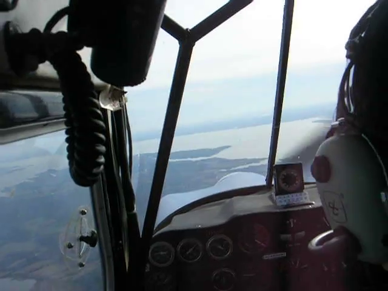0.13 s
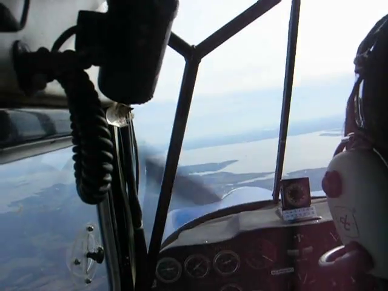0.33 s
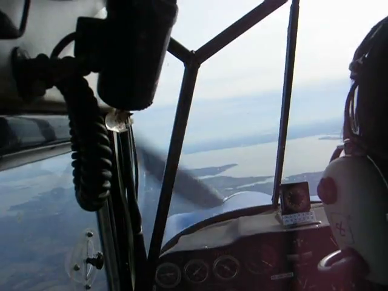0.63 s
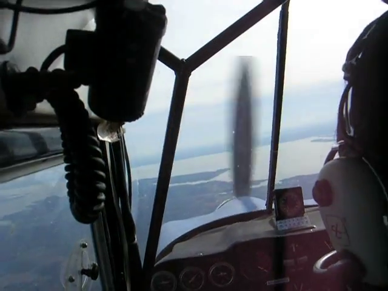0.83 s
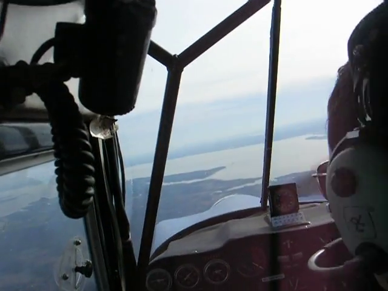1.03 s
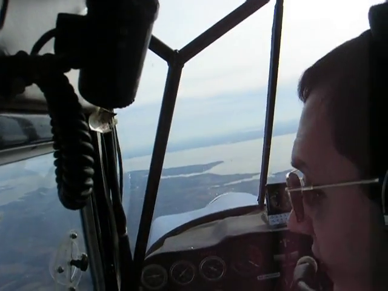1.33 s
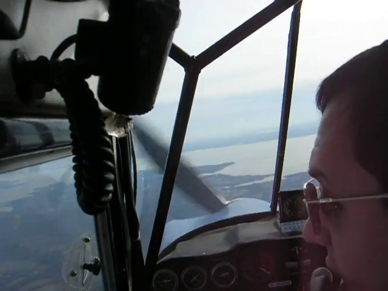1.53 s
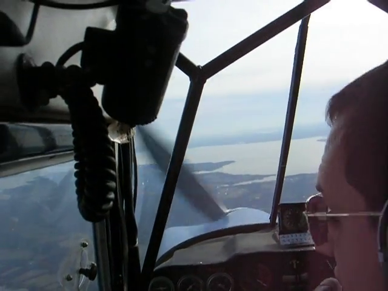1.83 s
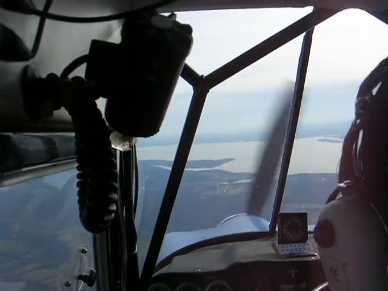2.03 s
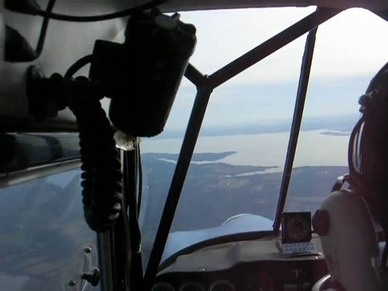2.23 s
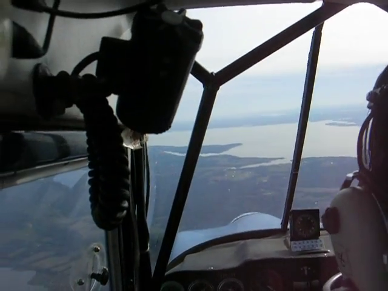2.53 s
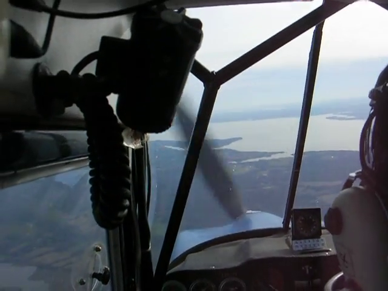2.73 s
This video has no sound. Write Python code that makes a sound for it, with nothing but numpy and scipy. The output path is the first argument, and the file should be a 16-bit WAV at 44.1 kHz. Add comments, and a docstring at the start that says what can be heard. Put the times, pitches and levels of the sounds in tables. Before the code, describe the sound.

A small propeller plane's engine drones steadily, heard inside the cockpit with rushing wind.

```python
"""Small piston plane, in the cockpit

Level flight at constant engine speed: propeller and exhaust drone on one harmonic series.
Under them the slipstream roars in pulses, cabin panels ring and air hisses at the windscreen.
Just past halfway the microphone moves through the cabin's standing waves, and the drone thins out."""
import sys
import numpy as np
from scipy import signal
from scipy.fft import rfft, irfft, next_fast_len
from scipy.io import wavfile

SR = 44100
rng = np.random.default_rng(int(sys.argv[2]) if len(sys.argv) > 2 else 0)


def output_pcm(signal):
    """Save a mono or channel-first signal as 16-bit PCM at the path in sys.argv[1].

    Samples are clipped to [-1, 1] before scaling.
    """
    pcm = np.clip(np.atleast_2d(signal).T, -1, 1) * 32767
    wavfile.write(sys.argv[1], SR, np.round(pcm).astype(np.int16))


N = 126567
TIME = np.arange(N) / SR

BLADE_HZ, JITTER_TURNS = 86.72, 0.006   # blade passes: their rate and unsteadiness (one turn a pass)
ROAR_DB, HISS_DB = -16.0, -25.5
ROAR_PULSE, HISS_PULSE = 0.33, 0.14   # how far the air swells with each blade
ROAR_FLUTTER_DB, HISS_FLUTTER_DB, BUFFET_DB = 1.12, 1, 0.44
LOW_ROAR_HZ, LOW_ROAR_DROP_DB = 420, 0.5
THROB_DB, WAVER_DB, HUM_SINK_DB = 2.5, 0.43, 1.5
START_S, DRIVE_DB, PEAK_LIMIT, CUTOFF_HZ = 0.036, 0.01, 1.05, 4650


def from_db(db):
    """Gain for a level in dB."""
    return 10 ** (np.asarray(db) / 20)


def rms_one(x):
    """Scale to an rms of 1."""
    return x / np.sqrt(np.mean(x ** 2) + 1e-20)


def ramp(middle_s, length_s):
    """A steady rise from 0 to 1."""
    return np.clip((TIME - middle_s) / length_s + .5, 0, 1)


def drift(rate_hz):
    """Smooth random motion with a spread of 1, mostly slower than rate_hz."""
    step, settle = 40, 2000
    pole = np.exp(-2 * np.pi * step * rate_hz / SR)
    noise = rng.standard_normal(N // step + settle + 2)
    slow = signal.lfilter([1], [1, -2 * pole, pole * pole], noise)[settle:]
    return np.interp(np.arange(N) / step, np.arange(len(slow)), rms_one(slow - slow.mean()))


def coloured(x, spectrum):
    """Shape x with an EQ curve of (frequency [Hz], level [dB]) points; rms 1."""
    size = next_fast_len(N)
    hz = np.maximum(np.arange(size // 2 + 1) * SR / size, 1)
    points_hz, points_db = np.transpose(spectrum)
    db = np.interp(np.log(hz), np.log(points_hz), points_db)
    return rms_one(irfft(rfft(x, size) * from_db(db), size)[:N])


def resonate(x, hz, width_hz):
    """Ring one resonance with x; rms 1."""
    radius = np.exp(-np.pi * width_hz / SR)
    feedback = [1, -2 * radius * np.cos(2 * np.pi * hz / SR), radius * radius]
    return rms_one(signal.lfilter([1, 0, -1], feedback, x))


def prop_wash(turns, depth, sharpness):
    """Turbulent air that swells as each blade passes."""
    puff = np.exp(sharpness * (np.cos(2 * np.pi * turns) - 1))
    return rng.standard_normal(N) * (1 + depth * puff)


def windscreen_hiss(turns):
    """Air rushes past the windscreen and through its seals."""
    # tone of the hiss: (frequency [Hz], relative level [dB])
    spectrum = [(600, -24), (1300, 1), (2000, 0), (2600, -0.3), (2950, 0.5), (3400, -2), (3900, -10.5),
                (4200, -29), (4500, -34)]
    air = coloured(prop_wash(turns, HISS_PULSE, sharpness=0.62), spectrum)
    return air * from_db(HISS_DB + HISS_FLUTTER_DB * drift(rate_hz=12))


def cabin_panels(turns, moved):
    """Eddies in the wash shake the panels and set them ringing in uneven bursts."""
    # panel resonances: (pitch [Hz], width [Hz], level at first spot [dB], level at second spot [dB])
    modes = [(816, 45, -30.5, -32), (904, 38, -26.5, -25), (973, 30, -28, -24.5), (1688, 67, -36.5, -39.5),
             (2918, 200, -35.5, -35)]
    out = 0
    for hz, width_hz, first_db, second_db in modes:
        shaking = prop_wash(turns, ROAR_PULSE, sharpness=4) * from_db(THROB_DB * drift(rate_hz=15))
        db = first_db + (second_db - first_db) * moved
        out = out + from_db(db) * resonate(shaking, hz, width_hz)
    return out


def slipstream_roar(turns, moved):
    """The slipstream beats on the fuselage; its low end eases a touch as the microphone moves."""
    # tone of the roar in the cabin: (frequency [Hz], relative level [dB])
    spectrum = [(30, -37), (50, -32.5), (70, -26), (105, -13.5), (150, -8.5), (200, -3), (250, -5.5),
                (320, -1.5), (400, -0.9), (500, -1.9), (620, -3.5), (730, -2), (810, -2.5), (1000, -7),
                (1250, -13), (1500, -25.5), (2200, -34.5), (4000, -56.5)]
    air = coloured(prop_wash(turns, ROAR_PULSE, sharpness=9), spectrum)
    low = signal.sosfiltfilt(signal.butter(2, LOW_ROAR_HZ, fs=SR, output="sos"), air)
    air = air + low * (from_db(-LOW_ROAR_DROP_DB * moved) - 1)
    return air * from_db(ROAR_DB + ROAR_FLUTTER_DB * drift(rate_hz=30))


def engine_drone(turns, moved):
    """Propeller and exhaust partials, locked to the shaft and balanced by the microphone's spot."""
    # drone partials: (pitch [x blade rate], level at first spot [dB], level at second spot [dB])
    partials = [(1, -29, -30), (1.5, -47.5, -44.5), (2, -24.5, -24), (2.5, -40.5, -44), (3, -30, -31.5),
                (3.5, -37, -38), (4, -23, -29), (4.5, -33.5, -46), (5, -24.5, -35), (5.5, -48.5, -31.5),
                (6, -32, -38.5), (6.5, -35.5, -37.5), (7, -44.5, -36.5), (7.5, -48.5, -38), (8, -26, -28.5),
                (9, -42.5, -37), (10, -39.5, -43.5), (10.5, -37, -33.5), (11, -35, -36), (12, -39, -43),
                (13, -44, -39.5), (14, -44.5, -44.5), (18, -46, -51.5)]
    out = 0
    for multiple, first_db, second_db in partials:
        waver_db = WAVER_DB * np.sqrt(multiple) * drift(rate_hz=3.7)   # higher partials waver more
        db = first_db + (second_db - first_db) * moved + waver_db
        if multiple == 2:   # this strong hum sinks late on
            db = db - HUM_SINK_DB * ramp(middle_s=2.13, length_s=0.25)
        phase = 2 * np.pi * (multiple * turns + rng.random())
        out = out + np.sqrt(2) * from_db(db) * np.sin(phase)
    return out


def scene():
    """Hiss, panels, roar and drone at one moving microphone."""
    # overall level of the scene, with one brief dip: (time [s], level [dB])
    level = [(0, 0.6), (1.1, .5), (1.6, 0), (2.25, 0.53), (2.53, -1.5), (2.72, 1), (2.87, -0.3)]
    turns = BLADE_HZ * TIME + JITTER_TURNS * drift(rate_hz=6.5)
    moved = ramp(middle_s=1.66, length_s=0.4)   # 0 at the microphone's first spot, 1 at its second
    buffet = from_db(BUFFET_DB * drift(rate_hz=21))   # turbulence moves all the wind noise together
    wind = slipstream_roar(turns, moved) + cabin_panels(turns, moved) + windscreen_hiss(turns)
    overall_gain = from_db(np.interp(TIME, *np.transpose(level)))
    return (overall_gain * (buffet * wind + engine_drone(turns, moved)))[None]


def record(dry):
    """A narrow-band recorder switches on, rounds the peaks and cuts the treble."""
    rounded = PEAK_LIMIT * np.tanh(from_db(DRIVE_DB) * dry / PEAK_LIMIT)
    treble_cut = signal.cheby2(16, 60, CUTOFF_HZ, fs=SR, output="sos")
    return signal.sosfilt(treble_cut, rounded * (TIME >= START_S))


dry = scene()
out = record(dry)
output_pcm(out)
```